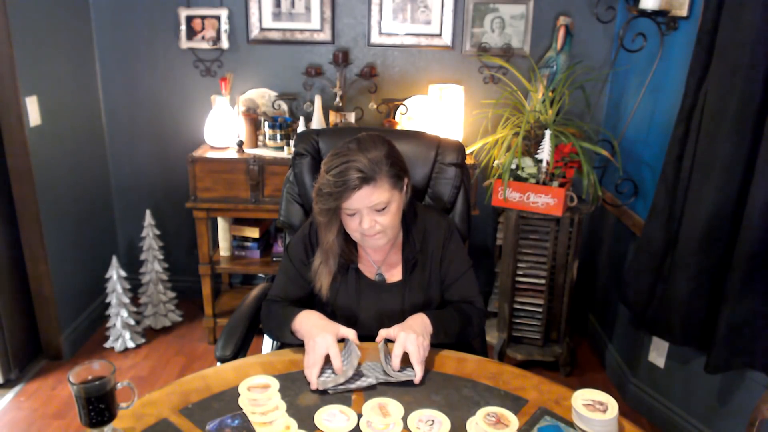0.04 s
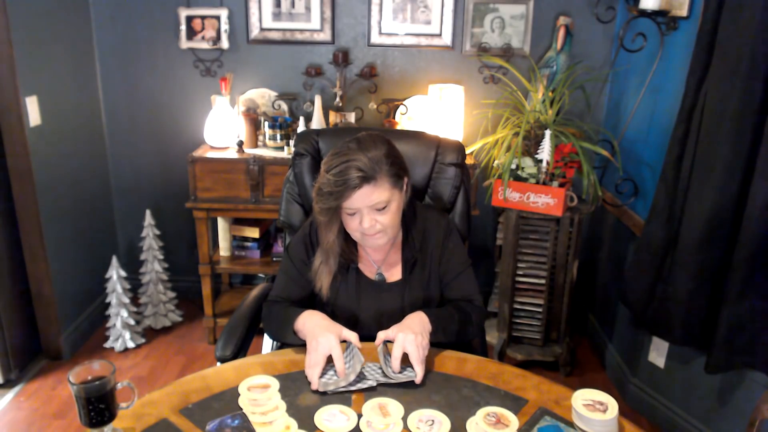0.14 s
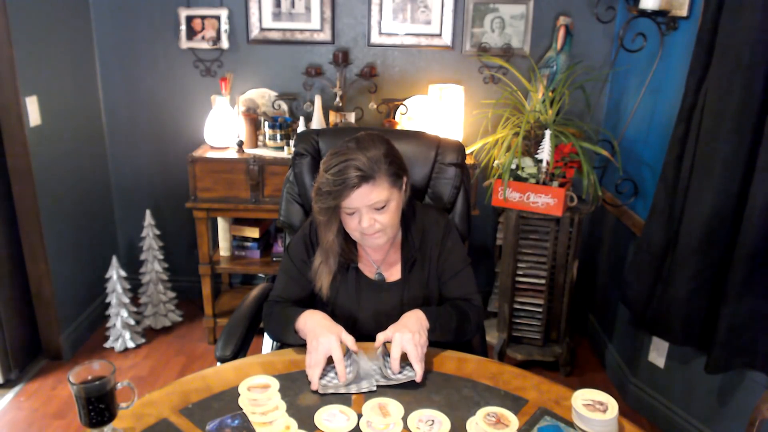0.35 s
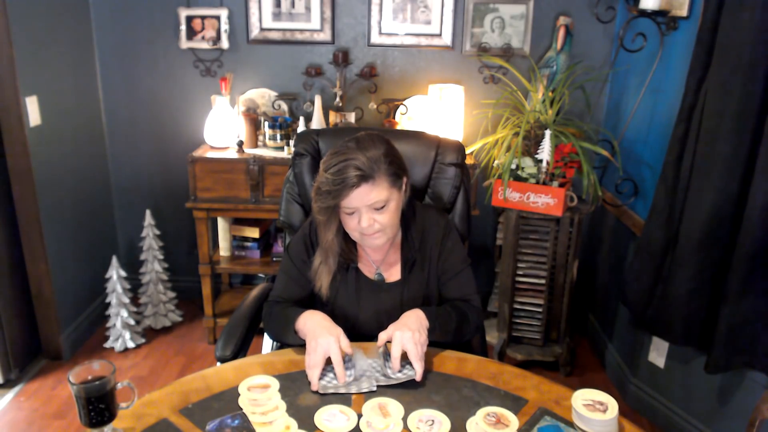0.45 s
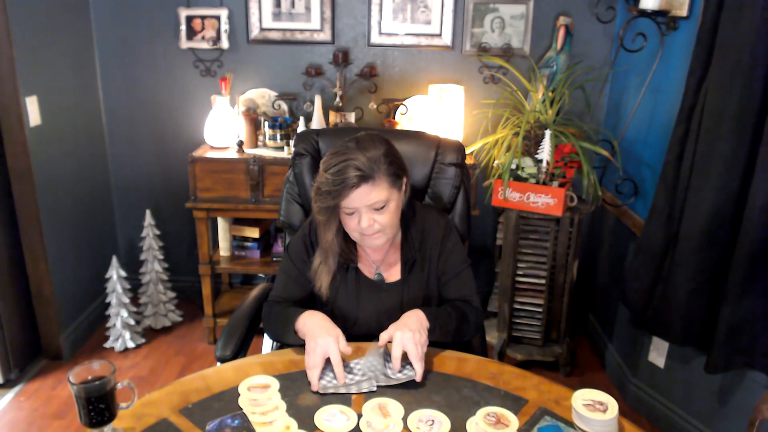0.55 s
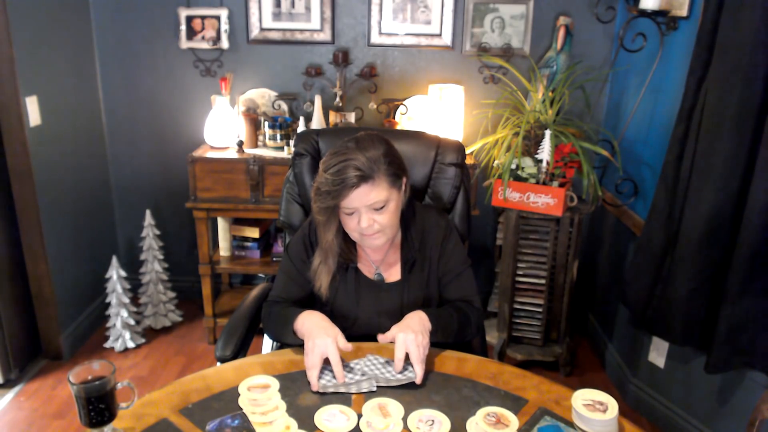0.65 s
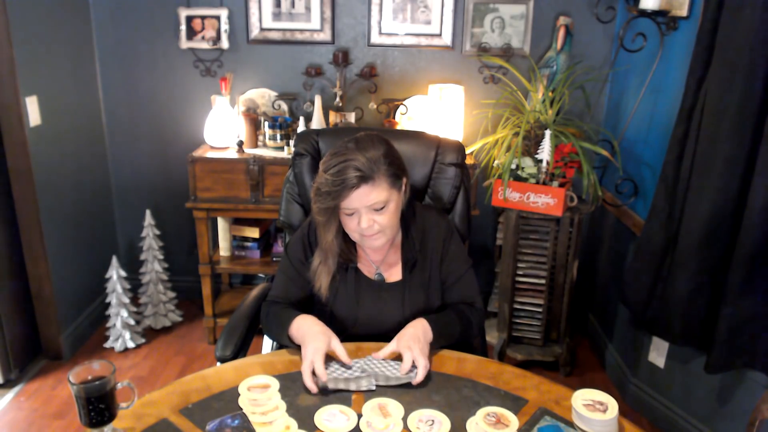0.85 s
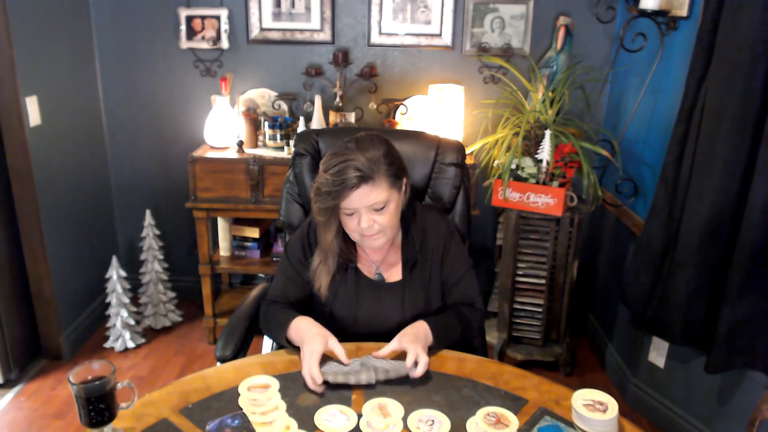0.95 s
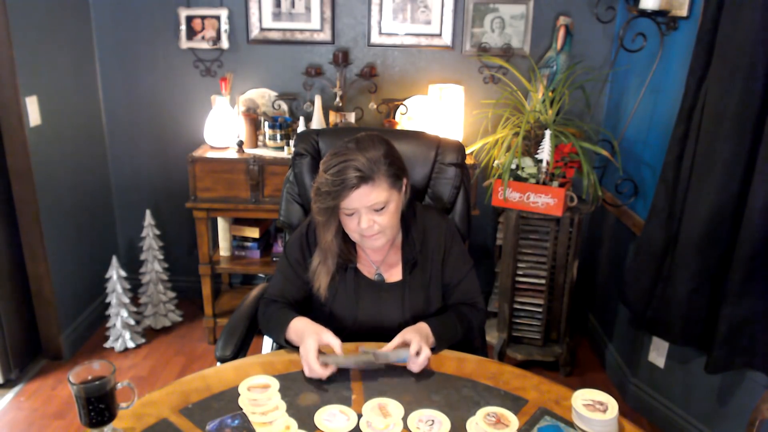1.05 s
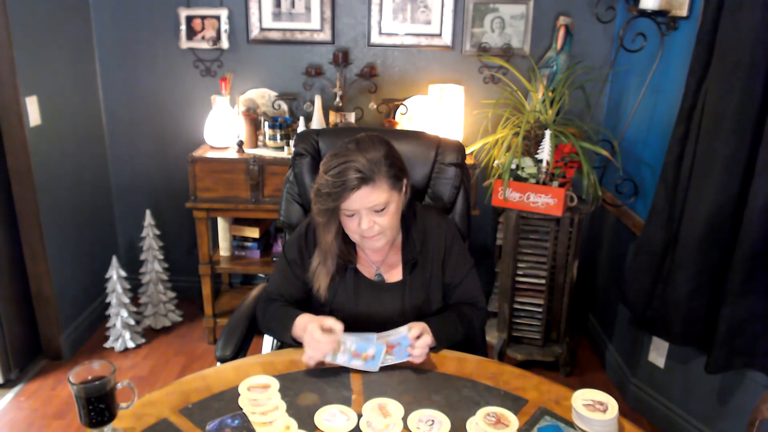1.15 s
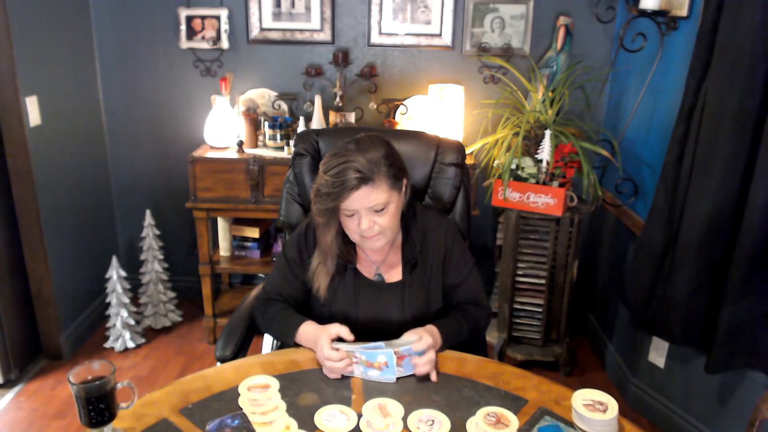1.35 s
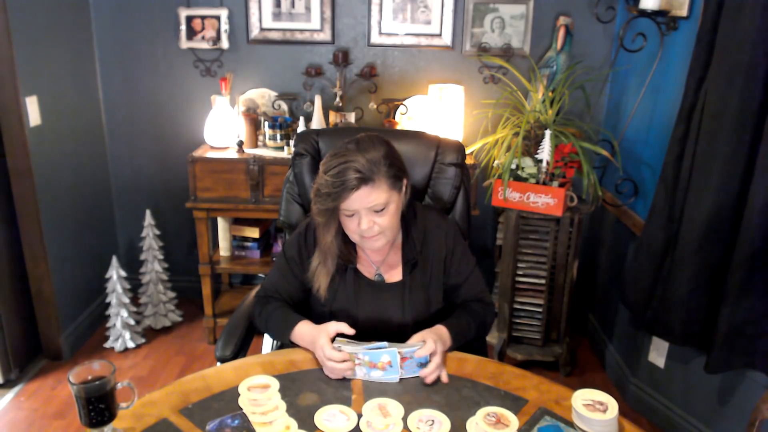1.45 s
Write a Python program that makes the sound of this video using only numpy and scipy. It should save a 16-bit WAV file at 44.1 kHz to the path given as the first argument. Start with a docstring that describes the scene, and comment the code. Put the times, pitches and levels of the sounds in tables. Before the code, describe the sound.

A deck of cards is riffle-shuffled once, then knocked square on a table.

```python
"""A deck of tarot cards is riffled on a padded table in a small, fairly live room.
First the cards leave the two thumbs in turn, each a tick, a snap and a slap, while their faces
crackle and small packets thump down. Next the halves slide together with stick-slip friction.
Last, a few knocks square the deck and excite its damped modes. Throughout, the room
reverberates, and a low hum and faint noise lie beneath."""
import sys
import numpy as np
from scipy import signal
from scipy.fft import rfft, irfft
from scipy.io import wavfile

SR = 44100
rng = np.random.default_rng(int(sys.argv[2]) if len(sys.argv) > 2 else 0)


def generate_wav(signal):
    """Clip the signal to [-1, 1] and save it as 16-bit WAV at the path in sys.argv[1]."""
    frames = np.transpose(np.atleast_2d(signal))
    scaled = np.clip(frames, -1, 1) * 32767
    pcm = np.round(scaled).astype(np.int16)
    wavfile.write(sys.argv[1], SR, pcm)


N = 66150
TIME = np.arange(N) / SR

# cards leaving the thumbs in turn: start_s, slap_db, snap_db, tick_db, snap_hz, directivity_db
CARD_RELEASES = [(0.184, -43.5, -41.5, -46.5, 3070, -6), (0.2009, -33.5, -37, -47, 2820, -4),
                 (0.2183, -35.5, -33, -38.5, 2290, -3), (0.2291, -35.5, -27.5, -39, 2130, -2.5),
                 (0.2401, -37.5, -27, -36.5, 2290, 0), (0.2603, -37.5, -25.5, -39, 1850, -7.5),
                 (0.2906, -48.5, -42, -47, 2230, 5.5), (0.3141, -31.5, -26, -36, 2800, -2.5),
                 (.3297, -33, -48, -41.5, 2340, -6), (.337, -33.5, -27, -23, 4280, 0),
                 (0.3421, -31.5, -25, -32.5, 2750, -1.5), (0.3496, -36.5, -33.5, -25, 2610, -2.5),
                 (0.369, -27.5, -21.5, -25, 2950, -1), (.378, -33, -20.5, -37.5, 3180, -3),
                 (.391, -32, -27, -32.5, 3350, -2.5), (.4065, -29, -36.5, -44, 2960, -4.5),
                 (.413, -28, -39.5, -27.5, 3030, -8.5), (0.419, -29, -32.5, -33, 2510, 1.5),
                 (0.4311, -28.5, -26.5, -25.5, 2930, -3.5), (0.4471, -30.5, -30.5, -33.5, 2450, -2),
                 (0.4614, -38.5, -37.5, -35, 2530, -6), (0.4683, -38, -35.5, -39, 2950, -2.5),
                 (0.4766, -31, -16.5, -39.5, 3500, -2), (.4862, -28.5, -20, -25.5, 3150, 0),
                 (0.4924, -37.5, -20, -33.5, 2960, 0), (.502, -30, -24, -35, 3330, -4.5),
                 (.512, -18, -21.5, -29, 2480, 2), (0.5272, -33.5, -33, -21.5, 3060, 0.5),
                 (0.5364, -24.5, -30.5, -32.5, 2640, -1.5), (0.5626, -37, -28, -36.5, 2600, -1),
                 (.566, -23.5, -31, -38, 2500, -2.5), (0.5831, -22.5, -26, -40, 2700, 2.5),
                 (.589, -29, -30, -58.5, 2280, -2.5), (.5938, -24, -44.5, -36, 2650, 0),
                 (.61, -49, -33.5, -40, 2500, -2), (0.615, -28, -36, -34.5, 2800, 1.5)]
# small packets landing on the table: start_s, level_db, pitch_hz
PACKET_LANDINGS = [(0.182, -49, 267), (0.1992, -48, 372), (.2605, -51, 510), (0.3308, -39, 356),
                   (0.3493, -28, 356), (.391, -35, 367), (.413, -34, 410), (0.443, -33, 254),
                   (0.4606, -30, 338), (0.4762, -26.5, 380), (0.513, -32, 242), (0.528, -41.5, 330),
                   (0.567, -38, 304), (0.5833, -29, 391), (0.593, -30.5, 380), (0.615, -36, 258),
                   (0.629, -40.5, 190)]
# card faces rubbing during the riffle: time_s, level_db
CRACKLE_ENVELOPE = [(.172, -77.5), (.18, -50), (.2, -44), (.245, -40), (.3, -57), (.33, -46), (.38, -30),
                    (.46, -38.5), (.5, -29.5), (.55, -37.5), (.615, -37.5), (.64, -46), (.67, -84)]
# spectrum of that rubbing: frequency_hz, gain_db
CRACKLE_SPECTRUM = [(200, -20), (500, 2), (1200, 0), (2600, 1), (4000, 2), (5500, -7), (10000, -17),
                    (16000, -20.5)]
# the halves sliding into each other: time_s, level_db
SLIDE_ENVELOPE = [(0, -82), (.035, -68), (.07, -122), (.15, -98), (.78, -93.5), (.83, -79), (.87, -73.5),
                  (.91, -72), (.935, -78), (.96, -70.5), (1.04, -79.5), (1.105, -64.5), (1.15, -75),
                  (1.19, -67), (1.255, -81), (1.28, -64), (1.32, -57), (1.34, -69), (1.4, -70.5),
                  (1.46, -89)]
# spectrum of that sliding: frequency_hz, gain_db
SLIDE_SPECTRUM = [(400, 3), (1800, 5), (3000, 0), (4500, 5), (7000, 4), (9000, 3), (12000, 4),
                  (14000, -7.5), (16000, -20.5)]
# corners catching: start_s, level_db
CORNER_CATCHES = [(0.03, -90), (0.8119, -56), (0.9047, -65.5), (1.009, -63), (1.267, -59), (1.323, -71)]
# brief pitched rubs of card on card: start_s, length_s, pitch_hz, level_db
FACE_RUBS = [(0.162, 0.007, 6140, -72), (.9, 0.049, 2150, -75.5), (0.971, 0.048, 850, -72.5),
             (1.094, 0.0083, 1700, -68.5), (1.183, 0.028, 4280, -69.5), (1.28, .014, 8500, -64),
             (1.469, 0.019, 3560, -72.5)]
# knocks that square the deck: start_s, thud_db, hollow_db, body_db, edge_db
SQUARING_KNOCKS = [(1.268, -75, -58.5, -50.5, -32), (1.2735, -40.5, -30.5, -33, -39.5),
                   (1.3228, -31.5, -49, -29, -39.5), (1.331, -45, -60.5, -39.5, -37.5),
                   (1.352, -47, -51.5, -37, -47), (1.471, -56, -60, -45, -59), (1.49, -59, -47.5, -39, -66)]
# modes of the deck in the hands: pitch_hz, gain_db, t60_s
DECK_MODES = [(178, -9.5, 0.076), (253, -4, 0.086), (321, -1.5, 0.064), (378, -16, 0.032),
              (610, -1.5, 0.031), (689, -1.5, 0.056), (936, -17, 0.33), (1075, -20, 0.34),
              (1240, -2.5, 0.053), (1305, -22, 0.4), (1380, 3.5, 0.018), (1937, -6.5, 0.043),
              (2325, -7, 0.018), (2360, -7.5, 0.026), (2800, -13, 0.017), (3600, -5, 0.014)]
# boundaries between the thud, hollow, body and edge modes: frequency_hz
MODE_GROUP_EDGES = [500, 820, 1700]
# the room's reverberation: frequency_hz, gain_db, t60_s
ROOM_RESPONSE = [(160, -6, 0.12), (300, -5, 0.56), (537, 3, 0.15), (860, -6.5, 0.36), (1508, 0, 0.29),
                 (2586, -2, 0.29), (4000, -6, 0.27), (5660, -6, 0.31), (8300, -6.5, 0.19),
                 (15100, -12.5, 0.5)]
# spectrum of the room noise: frequency_hz, gain_db
NOISE_SPECTRUM = [(15, -40), (25, 0), (76, -14), (127, -6), (185, -0.5), (476, 6), (796, -4.5),
                  (1160, -5.5), (3820, -29), (6210, -44), (8830, -32), (11300, -26.5), (16000, -35)]

CONTACT_S = 0.003   # nominal duration of one contact


def from_db(db):
    """Amplitude grows tenfold every 20 dB."""
    return 10 ** (np.asarray(db) / 20)


def unit_energy(x):
    """Normalisation: the squared samples sum to one."""
    return x / np.sqrt(np.sum(x ** 2) + 1e-20)


def at_hz(table, hz, column=1):
    """Interpolation of a table column over log frequency."""
    table = np.array(table)
    return np.interp(np.log(hz + 1e-9), np.log(table[:, 0]), table[:, column])


def around(hz, log_half_width):
    """Band edges whose geometric mean is hz."""
    return hz * np.exp(-log_half_width), hz * np.exp(log_half_width)


def band(x, low_hz, high_hz):
    """Causal band-pass filtering."""
    sections = signal.butter(2, [low_hz, min(high_hz, .48 * SR)], "band", fs=SR, output="sos")
    return signal.sosfilt(sections, x + 1e-18)


def coloured(x, spectrum):
    """Spectral shaping of a steady signal, at an rms of one."""
    gain = from_db(at_hz(spectrum, np.fft.rfftfreq(N, 1 / SR)))
    return unit_energy(irfft(rfft(x) * gain, N)) * np.sqrt(N)


def delayed(x, lag_s):
    """Pure delay, keeping the length."""
    return np.concatenate([np.zeros(int(lag_s * SR)), x])[:len(x)]


def add(out, start_s, sound):
    """Superposition: a sound joins the mix at start_s."""
    i = int(start_s * SR)
    out[i:i + len(sound)] += sound[:max(N - i, 0)]


def riffle(cards):
    """Elastic release: each bent card ticks off the thumb, snaps straight and slaps the pile."""
    direct, into_room = np.zeros((2, N))
    for start_s, slap_db, snap_db, tick_db, snap_hz, directivity_db in cards:
        tightness = (snap_hz / 3000) ** 0.36   # a tighter card ticks higher
        tick = contact(tick_db, 6000 * tightness, 12100 * tightness, scrape_db=-3)
        snap = contact(snap_db, *around(snap_hz, 0.28), scrape_db=3.5)
        slap = contact(slap_db, low_hz=680, high_hz=1890, scrape_db=-4.5)
        # the edge lets go first, the face lands last
        card = tick - delayed(snap, lag_s=0.00018) + delayed(slap, lag_s=0.0005)
        add(direct, start_s, from_db(directivity_db) * card)
        add(into_room, start_s, card)
    return direct + room(into_room)


def impact_force(t, noise_db, decay_s):
    """Impulsive excitation: a unit impulse and decaying noise of relative energy noise_db."""
    force = from_db(noise_db) * unit_energy(rng.standard_normal(len(t)) * np.exp(-t / decay_s))
    force[0] += 1
    return force


def contact(level_db, low_hz, high_hz, scrape_db=1.5):
    """Band-limited transient: an edge lets go and scrapes; level_db is the rms over CONTACT_S."""
    force = impact_force(TIME[:SR // 30], scrape_db, decay_s=0.0023)
    return from_db(level_db) * np.sqrt(CONTACT_S * SR) * unit_energy(band(force, low_hz, high_hz))


def pile():
    """Friction and impact: faces crackle as they interleave, and packets thump on the table."""
    out = friction(CRACKLE_ENVELOPE, CRACKLE_SPECTRUM)
    for start_s, level_db, pitch_hz in PACKET_LANDINGS:
        add(out, start_s, -contact(level_db, *around(pitch_hz, 0.48)))
    return out


def squaring(scatter_db=-1.5, cushion_hz=3850):
    """Modal ringing: each knock gives a thump of the whole deck, a dull crack and damped modes."""
    out, t = np.zeros(N), TIME[:SR // 3]
    for start_s, *group_db in SQUARING_KNOCKS:
        thump = contact(group_db[0] - 10, low_hz=213, high_hz=469, scrape_db=scatter_db)
        crack = contact(group_db[-1] - 5.5, low_hz=1252, high_hz=2580)
        add(out, start_s, thump + crack)
        # the cards do not all land at once
        force = unit_energy(impact_force(t, scatter_db, decay_s=0.0036))
        for pitch_hz, gain_db, t60_s in DECK_MODES:
            blow_db = group_db[np.searchsorted(MODE_GROUP_EDGES, pitch_hz)]
            mode = np.cos(2 * np.pi * pitch_hz * t) * np.exp(-np.log(1000) * t / t60_s)
            ring = band(signal.fftconvolve(force, mode), *around(pitch_hz, 0.29))
            add(out, start_s, .5 * from_db(blow_db + gain_db) * ring)
    cushion = signal.butter(6, cushion_hz, fs=SR, output="sos")   # soft fingers take off the treble
    return signal.sosfilt(cushion, out + 1e-18)


def sliding():
    """Sliding friction: as the halves are pushed together, corners catch and faces rub."""
    out, t = friction(SLIDE_ENVELOPE, SLIDE_SPECTRUM), TIME[:SR // 5]
    for start_s, level_db in CORNER_CATCHES:
        add(out, start_s, contact(level_db, low_hz=4360, high_hz=11200))
    for start_s, length_s, pitch_hz, level_db in FACE_RUBS:
        swell = np.sin(np.pi * np.sqrt(np.minimum(t / length_s, 1)))
        rub = swell * band(rng.standard_normal(len(t)), *around(pitch_hz, 0.2))
        add(out, start_s, from_db(level_db) * np.sqrt(length_s * SR) * unit_energy(rub))
    return out


def friction(envelope, spectrum, slips_per_s=2500, spread_db=3.5):
    """Stick-slip motion: paper on paper gives dense random impulses of uneven strength."""
    slips = (rng.random(N) < slips_per_s / SR) * rng.choice([-1, 1], N)
    strength = from_db(spread_db * np.minimum(rng.exponential(1, N), 4))
    level_db = np.interp(TIME, *np.transpose(envelope))
    return coloured(slips * strength, spectrum) * from_db(level_db)


def room(x, first_echo_s=0.00098, early_db=-2.5, early_decay_s=0.021):
    """Reverberation: early reflections from table and walls, then a diffuse tail dying by band."""
    t = TIME[:SR * 2 // 3]
    noise, response = rng.standard_normal((2, len(t))), np.zeros(len(t))
    arrived = t > first_echo_s
    early = from_db(early_db) * unit_energy(arrived * np.exp(-t / early_decay_s))
    edges_hz = np.geomspace(100, 18000, 16)
    for k, (low_hz, high_hz) in enumerate(zip(edges_hz, edges_hz[1:])):
        centre_hz = np.sqrt(low_hz * high_hz)
        t60_s = at_hz(ROOM_RESPONSE, centre_hz, column=2)
        tail = unit_energy(arrived * np.exp(-np.log(1000) * t / t60_s))
        reflections = band(noise[k % 2] * np.hypot(tail, early), low_hz, high_hz)
        response += from_db(at_hz(ROOM_RESPONSE, centre_hz)) * reflections
    return signal.fftconvolve(x, response)[:N]


def table_rumble(deck, gain_db=-23.5):
    """Structure-borne sound: the deck's jolts travel through the table to the microphone."""
    return from_db(gain_db) * band(np.abs(deck), low_hz=20, high_hz=59.6)


def background(hum_hz=138.5, hum_db=-68.5, waver_depth=0.12, noise_db=-67):
    """Noise floor: faint room noise and a hum with slight random amplitude modulation."""
    waver = np.interp(TIME, np.linspace(0, TIME[-1], 20), rng.standard_normal(20))
    hum = from_db(hum_db) * np.sqrt(2) * np.sin(2 * np.pi * hum_hz * TIME)
    noise = from_db(noise_db) * coloured(rng.standard_normal(N), NOISE_SPECTRUM)
    return hum * (1 + waver_depth * waver) + noise


def scene(low_cut_hz=120):
    """Superposition of the airborne card sounds, thin in the bass, with rumble and background."""
    deck = pile() + sliding() + squaring()
    both_hands = riffle(CARD_RELEASES[::2]) + riffle(CARD_RELEASES[1::2])
    low_cut = signal.butter(8, low_cut_hz, "high", fs=SR, output="sos")
    airborne = signal.sosfilt(low_cut, both_hands + deck + room(deck))
    return (airborne + table_rumble(deck) + background())[None]


def record(dry, cutoff_hz=16300):
    """Band limiting: a steep low-pass removes the highest treble."""
    return signal.sosfilt(signal.ellip(10, .2, 70, cutoff_hz, fs=SR, output="sos"), dry)


dry = scene()
out = record(dry)
generate_wav(out)
```